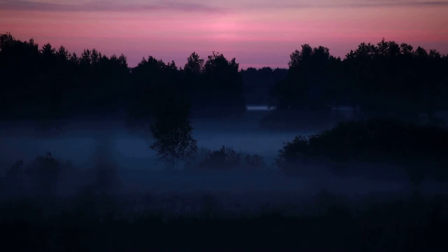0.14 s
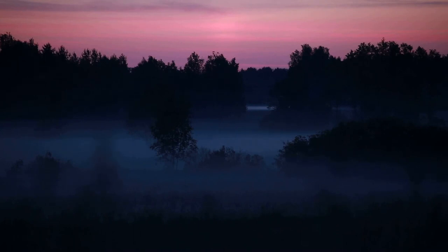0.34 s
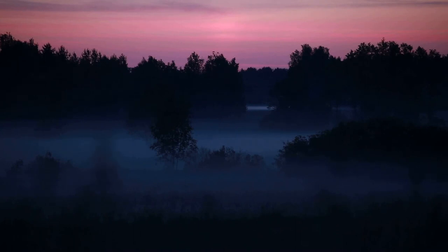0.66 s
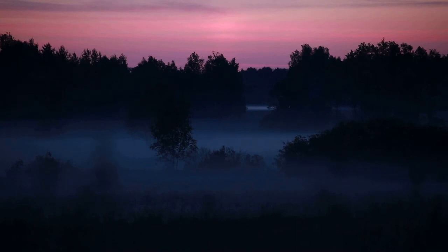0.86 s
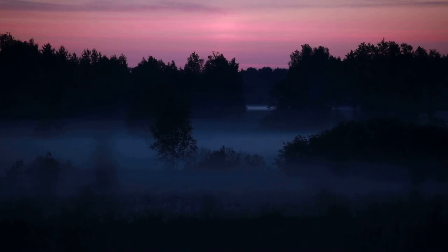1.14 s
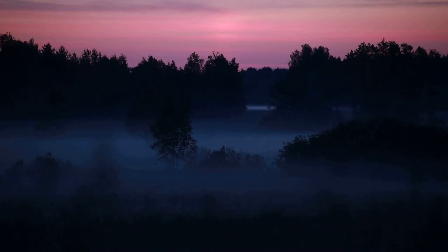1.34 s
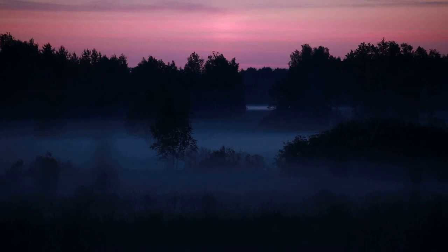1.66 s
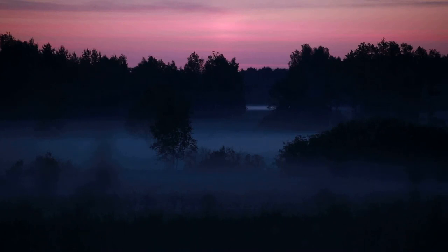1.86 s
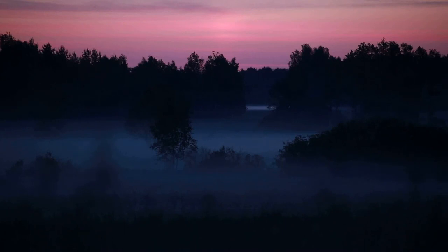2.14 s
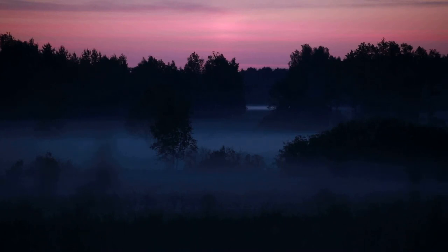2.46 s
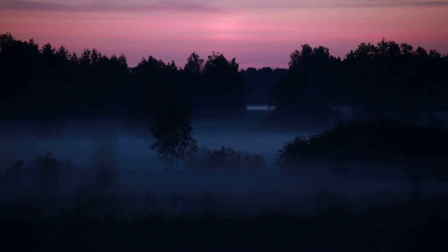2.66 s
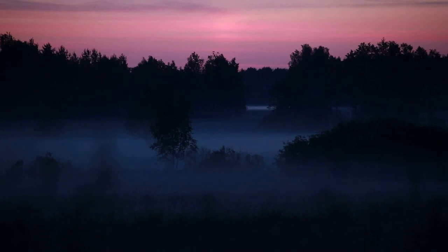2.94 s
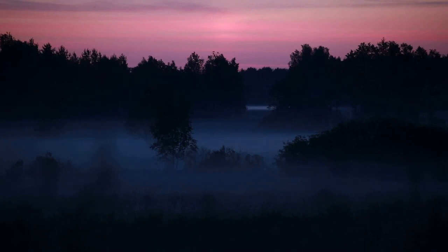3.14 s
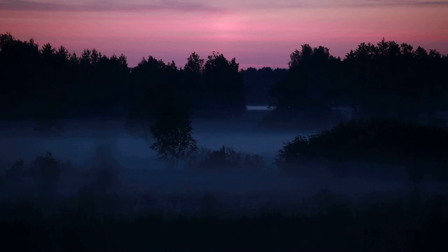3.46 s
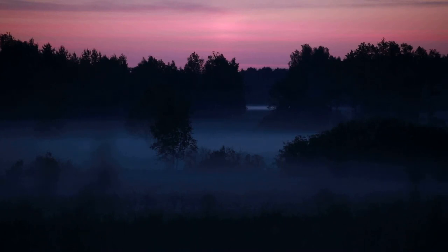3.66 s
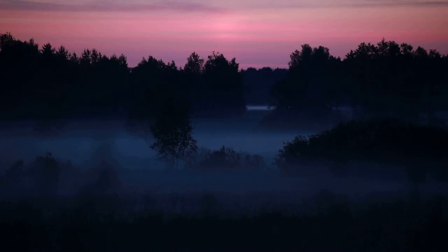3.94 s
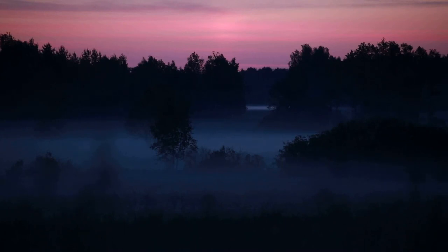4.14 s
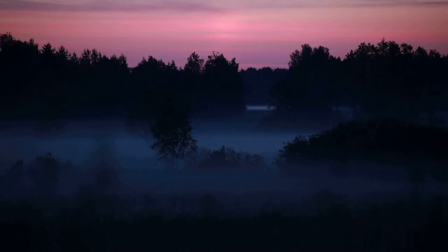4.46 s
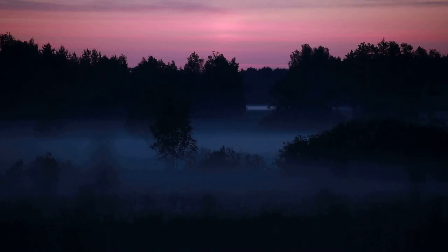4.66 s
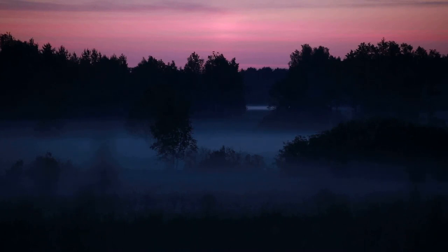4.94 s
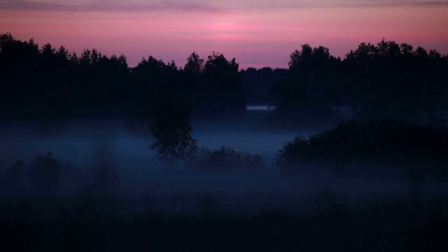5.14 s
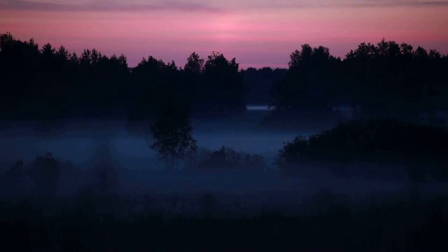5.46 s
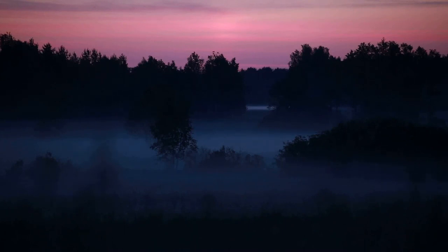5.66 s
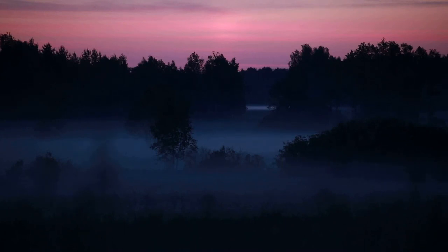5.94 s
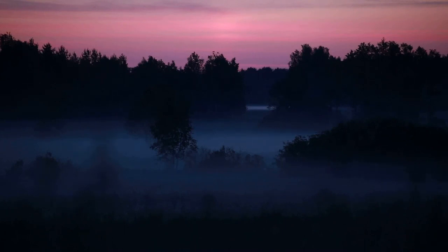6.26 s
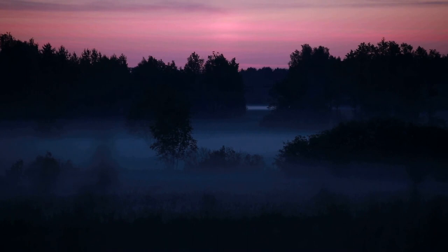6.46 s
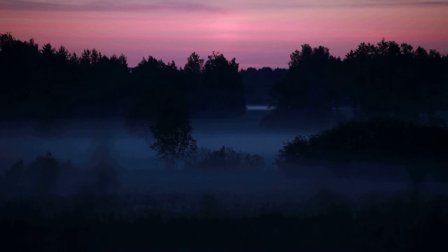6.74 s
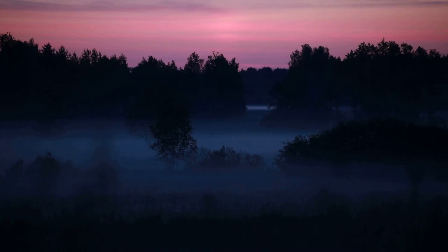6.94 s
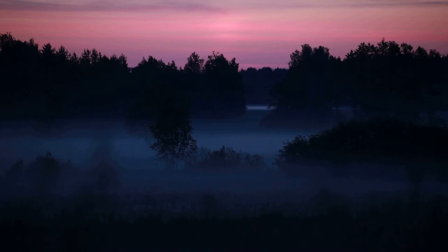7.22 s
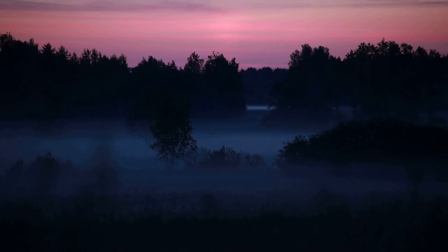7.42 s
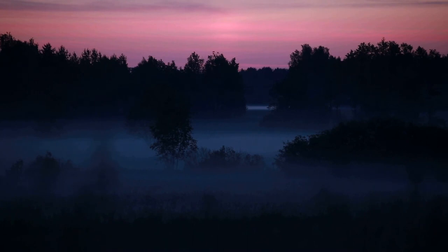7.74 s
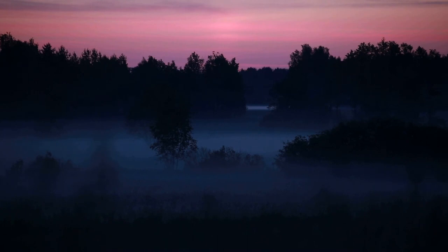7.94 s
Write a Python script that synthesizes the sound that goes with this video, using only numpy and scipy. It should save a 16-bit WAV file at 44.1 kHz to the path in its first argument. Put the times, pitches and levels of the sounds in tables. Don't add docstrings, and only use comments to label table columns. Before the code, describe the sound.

At dawn over a misty meadow, a close warbler starts at once with quick three-pip figures, then runs through falling trills, chirps, buzzes and sliding whistles. Behind it, countless far birds and frogs blur together, with faint whistles and repeated falling slurs. Near the end a frog in a ditch clicks rapidly. One microphone outdoors picks up soft air rumble and hiss, with short scattered echoes from trees.

```python
import sys
import numpy as np
from scipy import signal
from scipy.fft import rfft, irfft, next_fast_len
from scipy.io import wavfile
from scipy.ndimage import uniform_filter1d

SR = 44100
rng = np.random.default_rng(int(sys.argv[2]) if len(sys.argv) > 2 else 0)


def volts_from_db(level):
    exponent = np.asarray(level, float) / 20
    return 10 ** exponent


def wrap_up_sound(samples):
    columns = np.atleast_2d(samples).T
    tamed = np.clip(columns, -1, 1)
    steps = np.round(tamed * 32767).astype(np.int16)
    wavfile.write(sys.argv[1], SR, steps)


N = 356769

ARCH_BOW, DIP_BOW = .06, -.065
PIP_UNEVEN_PITCH = .01


def at_hz(points, hz):
    points = np.array(points)
    return np.interp(np.log(hz), np.log(points[:, 0]), points[:, 1])


def rms_one(x):
    return x / np.sqrt(np.mean(x ** 2) + 1e-20)


def add(out, start_s, hz, gain, waver_db=1.2):
    overtone_db, pitch_waver = -39, .005
    draws = rng.standard_normal(64)
    steps = np.arange(len(hz))
    level_waver = np.interp(steps / SR * 150, np.arange(63), draws[1:])
    pitch_wander = np.interp(steps / SR * 30, np.arange(63), draws[:0:-1])
    hz = hz * (1 + pitch_waver * pitch_wander)
    phase = 2 * np.pi * (np.cumsum(hz) / SR + draws[0])
    tone = np.sin(phase) + volts_from_db(overtone_db) * np.sin(2 * phase)
    tone = tone * gain * volts_from_db(waver_db * level_waver)
    at = round(start_s * SR) + steps
    inside = (at >= 0) & (at < N)
    out[at[inside]] += tone[inside]


def sing(out, notes, edge):
    for start_s, length_s, start_hz, mid_hz, end_hz, level_db in notes:
        z = np.linspace(-1, 1, max(int(length_s * SR), 8))
        bend_hz = (start_hz + end_hz) / 2 - mid_hz
        hz = mid_hz + z * (end_hz - start_hz) / 2 + z ** 2 * bend_hz
        fade = np.sin(np.pi / 2 * np.clip((1 - abs(z)) / edge, 0, 1)) ** 2
        add(out, start_s, hz, volts_from_db(level_db) * fade)


def bowed(notes, bow):
    return [(s, length_s, a, (1 + bow) * (a + b) / 2, b, db) for s, length_s, a, b, db in notes]


def whistle(out, rows, rough_hz=0):
    s, hz, level_db = np.transpose(rows)
    t = np.arange(s[0], s[-1], 1 / SR)
    glide = uniform_filter1d(np.interp(t, s, hz), size=100, mode="nearest")
    glide += rough_hz * signal.sawtooth(2 * np.pi * 150 * t)
    gain = np.interp(t, s, volts_from_db(level_db)) * signal.windows.tukey(len(t), .1)
    add(out, s[0], glide, gain, waver_db=1.16)


def pips(row, count, shape, course, late_s=0):
    first_s, last_s, first_hz, last_hz, peak_db = row
    slowing, bow_hz, in_db, out_db = course
    share, start_off_hz, end_off_hz = shape[:3]
    u = np.linspace(0, 1, count)
    when = u + slowing * (first_hz - last_hz) / 1000 * u * (u - 1)
    at = first_s + (last_s - first_s) * when
    hz = first_hz + (last_hz - first_hz) * when + 4 * bow_hz * when * (1 - when)
    level_db = peak_db + in_db * (1 - when) ** 3 + out_db * when ** 3
    uneven = rng.standard_normal((count, 2))
    hz = hz * (1 + PIP_UNEVEN_PITCH * uneven[:, 0])
    level_db = level_db + 1.2 * uneven[:, 1]
    length = share * np.gradient(at)
    reach = length / length.mean() * (1 - sum(shape[3:]) * when)
    start_hz, end_hz = hz + reach * start_off_hz, hz + reach * end_off_hz
    return np.transpose([at + late_s - length / 2, length, start_hz, hz, end_hz, level_db])


def tree_echoes(x, t60, level_db):
    t = np.arange(SR // 2) / SR
    blur = rng.standard_normal(len(t)) * volts_from_db(-60 * t / t60) * (t > .004)
    blur /= np.linalg.norm(blur)
    return x + volts_from_db(level_db) * signal.fftconvolve(x, blur)[:N]


def opening_triplets():
    # after_beat_s, pitch_hz, slide_hz, level_db
    triplet = [
        (0, 4170, 110, -32),
        (0.011, 4240, 70, -32.5),
        (0.0223, 3700, -220, -34.5),
    ]
    out, pip_s = np.zeros(N), .0069
    figure = []
    for beat in -.0008 + .0488 * np.arange(9) - pip_s / 2:
        swell_db = 2.5 - 18 * abs(beat - .1)
        for s, hz, slide, db in triplet:
            figure.append((beat + s, pip_s, hz - slide, hz, hz + slide, db + swell_db))
    figure = np.array(figure)
    figure[:, 2:5] *= 1 + PIP_UNEVEN_PITCH * rng.standard_normal((len(figure), 1))
    sing(out, figure, edge=0.66)
    return out


def short_notes():
    # start_s, length_s, start_hz, end_hz, peak_db
    mostly_falling = [(0, .056, 1717, 1560, -50), (.03, .72, 4860, 4640, -59), (.125, .022, 2650, 2250, -42),
                      (.166, .063, 3980, 3260, -36.5), (.373, .022, 3880, 3060, -38.5),
                      (.403, .072, 3050, 2280, -41.5), (1.522, .04, 6420, 6000, -51),
                      (1.715, .108, 2050, 1880, -49), (1.89, .023, 3400, 2220, -44.5),
                      (3.968, .056, 2900, 2700, -44), (4.34, .03, 4300, 3460, -35), (4.596, .026, 4200, 3480, -33),
                      (6.006, .13, 1900, 1730, -48.5), (6.705, .014, 6300, 5300, -48),
                      (6.68, .015, 6500, 5250, -46), (6.722, .0098, 6600, 5400, -52),
                      (2.726, .008, 4300, 4800, -35), (2.734, .008, 4350, 4600, -32),
                      (2.742, .008, 4550, 4350, -30), (2.75, .009, 4250, 3950, -32), (7.25, .042, 1560, 1020, -52),
                      (6.572, .022, 2950, 2400, -44), (6.632, .175, 1880, 1780, -43),
                      (6.78, .085, 1800, 1790, -51), (5.75, .022, 3380, 3200, -44), (5.774, .03, 3320, 3150, -46),
                      (6.452, .018, 2700, 2450, -49), (6.513, .062, 5050, 4480, -38),
                      (7.122, .045, 4000, 3050, -52), (1.405, .035, 5050, 4300, -60)]
    rising = [(.846, .085, 3450, 3730, -46), (1.2, .102, 3200, 3750, -48), (1.622, .092, 3070, 3510, -49.5),
              (3.183, .032, 3950, 4800, -44), (3.258, .03, 2450, 3050, -48), (3.419, .039, 3080, 3330, -40),
              (3.836, .022, 4700, 5650, -50), (6.757, .0144, 3610, 4500, -38),
              (7.283, .04, 4130, 4270, -34), (5.744, .01, 2400, 3300, -50), (5.85, .01, 2400, 3350, -50),
              (5.955, .01, 2400, 3450, -50), (7.29, .045, 2850, 3000, -49), (4.08, .025, 2300, 2450, -47),
              (3.008, .008, 3500, 4700, -52), (3.024, .008, 4200, 5800, -52), (3.284, .01, 5600, 6450, -53),
              (7.212, .012, 4200, 4850, -42), (.872, .1, 3090, 3200, -49)]
    arched = [(.355, .022, 4800, 5100, -55), (1.269, .033, 3450, 2180, -47), (2.503, .038, 3625, 2260, -46),
              (7.668, .055, 2800, 2550, -48), (3.886, .039, 3560, 3180, -39.5),
              (5.65, .0139, 2620, 3730, -40.5), (5.85, .029, 3260, 3300, -41),
              (5.958, .027, 3390, 3530, -38.5), (6.568, .068, 3300, 3800, -36),
              (7.028, .056, 1290, 1330, -52), (4.94, .055, 2580, 2380, -50)]
    dipped = [(1.677, .067, 3460, 4400, -46.5), (3.612, .033, 7000, 5650, -51),
              (3.68, .035, 5250, 3300, -40), (3.729, .0096, 4030, 3600, -38),
              (3.863, .022, 5230, 4450, -42.5), (5.545, .012, 4750, 4450, -33),
              (3.762, .048, 3000, 4000, -40), (6.657, .02, 6450, 5850, -55),
              (6.722, .042, 2850, 3750, -41.5), (6.532, .047, 3650, 2950, -38),
              (6.69, .033, 5350, 3750, -37), (6.737, .038, 5250, 3450, -41)]
    hook_notes = [
        (6.867, .046, 4470, 3900, -49.5),
    ]
    # start_s, length_s, pitch_hz, peak_db
    held = [(0, .025, 2820, -47), (.035, .095, 2660, -43), (.25, .07, 1350, -54), (4.918, .035, 5100, -47),
            (3.826, .012, 3650, -48), (.45, .05, 1570, -52), (.6, .1, 2690, -43), (1.697, .043, 2395, -45),
            (2.669, .03, 3400, -37), (2.953, .02, 5030, -42.5), (3.92, .018, 3820, -42),
            (3.929, .021, 4130, -43.5), (8.066, .03, 2650, -46), (5.261, .016, 3760, -42),
            (6.02, .085, 3040, -46), (6.12, .079, 1806, -49), (6.585, .04, 2400, -42),
            (6.508, .022, 3400, -43), (3.29, .024, 6450, -51), (7.082, .075, 1278, -49),
            (7.137, .12, 1560, -49), (7.29, .05, 1000, -55)]
    sag = .012
    out = np.zeros(N)
    sing(out, bowed(arched, ARCH_BOW) + bowed(hook_notes, .3) + bowed(dipped, DIP_BOW), edge=0.27)
    sing(out, bowed(mostly_falling + rising, 0), edge=0.32)
    level_notes = [(s, length_s, hz * (1 + sag / 2), hz, hz * (1 - sag / 2), db)
                   for s, length_s, hz, db in held]
    sing(out, level_notes, edge=0.34)
    return out


def croak(clicks):
    # pitch_hz, level_db, t60_s
    sac_modes = [
        (2050, 11.5, 0.013),
        (1680, -10, 0.0058),
        (2350, -1.5, 0.018),
    ]
    out = 0
    for hz, level_db, t60 in sac_modes:
        r, w = volts_from_db(-60 / (t60 * SR)), 2 * np.pi * hz / SR
        zeros, poles = [0, volts_from_db(level_db) * np.sin(w)], [1, -2 * r * np.cos(w), r * r]
        out = out + signal.lfilter(zeros, poles, clicks + 1e-18)
    return out


def frog_crowd(crowd_db):
    happens = rng.random(N) < 110 / SR
    many = happens * volts_from_db(3.0 * rng.standard_normal(N)) * rng.choice([-1, 1], N)
    many[round(.028 * SR)::round(.037 * SR)] = 1.75
    calls = volts_from_db(crowd_db) * rms_one(croak(many))
    band = signal.butter(2, [1200, 4500], "band", fs=SR, output="sos")
    return signal.sosfilt(band, calls)


def far_birds(level_db, count):
    # pitch_hz, level_db
    far_pitches = [(1400, -15.5), (2000, -2), (2800, 1), (3800, -2), (4800, -7), (5500, -14), (6800, -26)]
    out, draw = np.zeros(N), rng.random((count, 6))
    length = 0.00485 * 16.0 ** draw[:, 1] ** 2
    hz = 1400 * 4.8 ** draw[:, 2]
    steepness = 0.3025 * (0.027 / length) ** 0.314
    bend = 1 + (draw[:, 3:5] - .5) * steepness[:, None]
    loud_db = at_hz(far_pitches, hz) + 9.0 * draw[:, 5] - 7.5 * draw[:, 1]
    sing(out, zip(draw[:, 0] * N / SR, length, hz * bend[:, 0], hz, hz * bend[:, 1], loud_db), edge=0.63)
    return volts_from_db(level_db) * rms_one(out)


def air_and_hiss():
    # pitch_hz, density_db
    floor_spectrum = [(26, -22), (52, -1), (111, -1.5), (408, -5), (1260, -5.5), (1910, -4.5), (3200, -4.8),
                      (4400, -7.5), (5620, -20), (7360, -22), (13600, -19.5), (15700, -24)]
    size = next_fast_len(N)
    hz = np.arange(size // 2 + 1) * SR / size + 1
    spectrum = rfft(rng.standard_normal(size)) * volts_from_db(at_hz(floor_spectrum, hz))
    return volts_from_db(-55) * rms_one(irfft(spectrum, size)[:N])


def high_rasp():
    # time_s, pitch_hz, level_db
    rasp = [
        (.268, 6100, -56),
        (.288, 6800, -49),
        (0.315, 6340, -50),
    ]
    out = np.zeros(N)
    whistle(out, rasp, rough_hz=350)
    return out


def distant_whistles():
    # start_s, length_s, start_hz, end_hz, peak_db
    far_arches = [(1.005, .108, 3550, 4400, -55), (1.37, .135, 3550, 4380, -53),
                  (1.125, .16, 1880, 1850, -52), (1.055, .1, 2200, 2550, -52),
                  (2.04, .065, 4100, 3900, -56), (2.87, .135, 3400, 4000, -54),
                  (3.475, .045, 6400, 5000, -58), (7.045, .08, 2080, 2080, -51),
                  (.305, .11, 2500, 2500, -52), (7.72, .03, 2250, 2300, -51), (2.3, .045, 4250, 3850, -55)]
    far_dips = [(.5, .09, 2850, 3600, -56), (1.85, .1, 4050, 4600, -57), (2.15, .065, 4250, 2750, -55),
                (3.47, .03, 6100, 4300, -53), (3.065, .14, 4050, 2800, -54)]
    far_glides = [(.955, .04, 1700, 1680, -55), (1.345, .05, 1900, 1880, -53), (1.53, .07, 4700, 4600, -58),
                  (1.92, .085, 5450, 5400, -65), (2.005, .04, 4600, 3950, -57),
                  (2.388, .05, 2620, 2580, -51), (2.94, .06, 2100, 2050, -54),
                  (3.02, .036, 5900, 6650, -55), (3.645, .035, 5700, 6100, -56),
                  (3.6, .042, 3900, 4500, -56), (3.49, .03, 3420, 3200, -52),
                  (7.765, .045, 2870, 2780, -53), (3.81, .06, 2700, 2300, -53),
                  (4.03, .02, 5750, 5100, -57), (4.175, .02, 5700, 5100, -57),
                  (4.35, .015, 6000, 5000, -57), (4.3, .22, 4930, 4850, -59), (4.66, .24, 4790, 4740, -58),
                  (4.42, .08, 4500, 4400, -59), (4.42, .04, 3520, 3520, -54), (5.13, .14, 3560, 3440, -55),
                  (5.15, .04, 2720, 2700, -52), (5.31, .08, 4850, 4750, -59), (5.35, .09, 3060, 3040, -56),
                  (5.6, .12, 3330, 3450, -54), (6.02, .09, 2580, 2600, -55), (6.2, .07, 2850, 2700, -54),
                  (6.64, .06, 2660, 2560, -53), (5.855, .022, 5500, 5480, -59),
                  (5.91, .02, 2000, 2080, -53), (5.875, .03, 2450, 2350, -54)]
    out = np.zeros(N)
    sing(out, bowed(far_arches, ARCH_BOW) + bowed(far_dips, DIP_BOW) + bowed(far_glides, 0), edge=.3)
    return out


def trills():
    # first_s, length_s, peak_db
    falling_starts = [(0.583, .113, -34), (0.756, .099, -33), (.917, .114, -31), (1.112, .1, -33.5),
                      (1.289, .112, -33.5)]
    # first_pip_s, last_pip_s, first_hz, last_hz, peak_db
    vees = [
        (1.7775, 2.053, 4150, 2420, -36.5),
        (3.2264, 3.2952, 4250, 3950, -30),
        (3.3095, 3.4555, 3600, 2480, -34.5),
    ]
    chips = [(4.2483, 4.2653, 4430, 4180, -32), (4.381, 4.417, 3360, 2750, -33),
             (4.5055, 4.5217, 4400, 3990, -32), (4.634, 4.6689, 3340, 2850, -33),
             (7.0295, 7.0909, 2590, 2500, -39)]
    rattling = [(4.2825, 4.3242, 3800, 3530, -33), (4.5387, 4.5793, 3300, 3250, -34.5),
                (.575, .665, 7600, 7300, -65), (3.475, 3.535, 7000, 6200, -63)]
    buzzing = [
        (6.1069, 6.3807, 5150, 3150, -32.5),
        (7.6139, 7.8581, 5000, 3300, -35.5),
    ]
    short_buzz = [(7.3575, 7.4872, 3740, 3000, -38)]
    paired = [
        (6.7714, 6.9993, 4290, 2800, -34.5),
        (6.7821, 7.0153, 4290, 2620, -33.5),
    ]
    tremble = [
        (7.229, 7.28, 4250, 4130, -33),
        (6.579, 6.65, 4600, 5370, -40),
    ]
    sagging = [(2.7662, 2.8667, 3250, 2600, -37)]
    arching = [(3.9583, 4.1254, 3850, 2650, -34.5), (7.9655, 8.03, 3900, 2550, -33)]
    hooked = [(2.253, 2.383, 4400, 2500, -36.5)]
    climbing = [(3.262, 3.285, 5300, 6250, -50)]
    leading = [(3.974, 4.074, 3380, 2900, -43)]
    falls = [(s, s + length_s, 4030, 2500, db) for s, length_s, db in falling_starts]
    kinds = [falls, vees, chips, rattling, buzzing, short_buzz, paired, tremble,
             sagging, arching, hooked, climbing, leading]
    pip_counts = [(9, 8, 9, 8, 9), (20, 6, 11), (2, 3, 2, 3, 5), (5, 5, 8, 7), (40, 35), (16,), (8, 8),
                  (5, 5), (6,), (8, 6), (5,), (4,), (5,)]
    # sounding_share of the beat, start_off_hz, end_off_hz, turn of the sweep
    pip_shapes = [(.44, 420, -330, 2.3), (.28, 850, -300, .45), (.5, -280, 170), (.6, -550, 500),
                  (1.15, -350, 170), (1.1, -450, 230), (.34, -620, 220), (.95, 70, -50), (.45, -380, 320),
                  (.36, -600, 100), (.35, -550, 200), (.55, 800, -800), (.6, 60, -120)]
    # slowing per kHz of fall, bow_hz, first_pip_db, last_pip_db
    courses = [(-.125, 320, -6, -8.5), (.04, -70, -4, -4), (-.01, 10, -1.5, -.7), (.01, 5, -.2, -2.2),
               (.24, -170, -11, -9), (.15, -100, 1.5, -2), (-.018, -20, 3.5, -6), (.01, -160, -2, -3),
               (.2, -300, 2.5, -8), (-.08, 420, -5, -4), (.02, -60, -7, -4), (.01, 10, -5, -.5),
               (.01, 80, -3, -1)]
    # pip shape (sounding_share, start_off_hz, end_off_hz), late_s, level_db
    vee_upstroke = ((.44, -350, 420), .0037, -.8)
    hook_downstroke = ((.35, 450, -1300), .0105, -1.5)
    out = np.zeros(N)
    for rows, counts, shape, course in zip(kinds, pip_counts, pip_shapes, courses):
        for row, count in zip(rows, counts):
            sing(out, pips(row, count, shape, course), edge=0.62)
    for kind, (shape, late_s, level_db) in ((1, vee_upstroke), (10, hook_downstroke)):
        for row, count in zip(kinds[kind], pip_counts[kind]):
            second_stroke = np.add(row, [0, 0, 0, 0, level_db])
            sing(out, pips(second_stroke, count, shape, courses[kind], late_s), edge=0.6)
    return out


def repeated_figures():
    # (start_s, level_db, stretch)
    figures = [
        ([(0, 4700, -22), (.005, 4046, 0), (.025, 3250, -3.5), (.035, 2500, -15)], [(5.272, -39.5, 0.86), (5.333, -34.5, 1.05), (5.405, -34.5, 1.07), (5.479, -34, .95), (5.556, -33, 0.73)]),
        ([(0, 5300, -24), (.005, 4350, -1), (.013, 3900, 1), (.027, 3880, -3)], [(5.616, -33, 0.98), (5.711, -37, 0.96), (5.816, -37.5, 0.94), (5.926, -38, 0.92)]),
        ([(0, 1550, -12), (.015, 1725, 0.5), (.034, 1714, 5), (.041, 1623, -10), (.048, 1620, -11), (.058, 1562, 1.5)], [(1.019, -44, 0.95), (1.64, -42.5, 0.95), (2.272, -40.5, 0.96)]),
    ]
    # (start_s, level_db, stretch)
    slide_figure = ([(0, 6330, -24), (.015, 6200, -19), (.031, 5760, -16), (.061, 4980, -11),
                    (.091, 4630, -7.5), (.121, 4360, -1.5), (.152, 4120, -.7), (.172, 3850, -14)],
                    [(1.54, -39, .88), (3.003, -30, 0.99), (4.853, -32, .97)])
    out = np.zeros(N)
    for rows, repeats in figures + [slide_figure]:
        for s, level_db, stretch in repeats:
            whistle(out, np.multiply(rows, [stretch, 1, 1]) + [s, 0, level_db])
    return out


def falling_slurs():
    # start_s, peak_db
    single_slurs = [(2.435, -51), (2.71, -50), (2.772, -53), (3.014, -50), (3.082, -49.5), (3.296, -43),
                    (3.383, -51), (3.519, -50), (4.751, -46)]
    # first_s, beat_s, first_db, last_db
    slur_runs = [
        (3.936, .1165, -44, -42),
        (4.857, .1025, -48, -48),
    ]
    slurs_per_run = (7, 7)
    # length_s, start_hz, mid_hz, end_hz
    full_slur = (.028, 2700, 1950, 1450)
    short_slur = (.018, 2150, 1800, 1480)
    out = np.zeros(N)
    slurs = [(s, *full_slur, db) for s, db in single_slurs]
    for (first, beat, a, b), count, slur in zip(slur_runs, slurs_per_run, (full_slur, short_slur)):
        slurs += [(first + k * beat, *slur, a + (b - a) * k / count) for k in range(count)]
    sing(out, slurs, edge=0.6)
    sing(out, np.add(slurs, [.011, 0, 0, 0, 0, -5]), edge=0.6)
    return out


def zigzag():
    # first_pip_s, last_pip_s, first_hz, last_hz, peak_db
    zigzag_row = (2.6012, 2.6775, 2900, 4650, -32.5)
    # pip shape (sounding_share, start_off_hz, end_off_hz), late_s
    strokes = [
        ((0.27, 650, -250), -0.0021),
        ((.25, 950, -900), 0.0019),
    ]
    # slowing per kHz of fall, bow_hz, first_pip_db, last_pip_db
    zigzag_course = (-.11, 300, -7, -2)
    out = np.zeros(N)
    for shape, late_s in strokes:
        sing(out, pips(zigzag_row, 5, shape, zigzag_course, late_s), edge=0.74)
    return out


def even_series():
    # rows (time_s, pitch_hz, level_db), rough_hz
    series = [
        ([(0, 5200, -58), (.06, 4920, -52.5)], 110),
        ([(.07, 4830, -74), (.22, 4800, -61.5)], 0),
        ([(.08, 6400, -72), (.145, 6650, -65)], 300),
    ]
    out = np.zeros(N)
    for beat in 4.065 + .195 * np.arange(6):
        for rows, rough_hz in series:
            whistle(out, np.add(rows, [beat, 0, 0]), rough_hz=rough_hz)
    return out


def near_frog():
    # start_s, peak_db, pitch_hz
    warmup = [(6.4762, -50, 1680), (6.5026, -50, 1250), (6.55, -47, 1290), (6.5864, -48, 1280),
              (6.6154, -47, 1290), (6.6593, -44, 1420), (6.6912, -43, 1530), (6.7263, -43, 1640),
              (6.7615, -40, 1640), (6.7965, -40, 1560), (6.831, -42, 1750)]
    main_clicks = [(6.8613, -40, 2010), (6.9032, -38, 2010), (6.9376, -39, 2060), (6.9726, -38, 2030),
                   (6.9894, -39, 2060), (7.016, -37, 2040), (7.0444, -38, 2020), (7.1247, -37, 2040),
                   (7.1581, -37, 2080), (7.1831, -40, 2170), (7.1974, -42, 2170), (7.2295, -39, 2180),
                   (7.2534, -38, 2170), (7.2654, -42, 2160), (7.2898, -39, 2190), (7.3034, -37, 2170),
                   (7.3272, -35, 2060), (7.3701, -35, 2060), (7.4061, -37, 2050), (7.431, -41, 2060),
                   (7.445, -36, 2060), (7.4699, -42, 2060), (7.4834, -37, 2030), (7.5128, -34, 2040),
                   (7.5443, -44, 2020), (7.5582, -36, 2030), (7.5867, -36, 2030)]
    ending = [
        (7.6064, -44, 1760),
        (7.6365, -37, 1790),
        (7.6514, -41, 1770),
        (7.6655, -39, 1810),
    ]
    out, t = np.zeros(N), np.arange(SR // 20) / SR
    attack_s, t60_s = .0004, .022
    ring = (1 - np.exp(-t / attack_s)) * volts_from_db(-60 * t / t60_s)
    ring /= ring.max()
    settling = 1 + .13 * np.exp(-t / .0018)
    snap = np.exp(-t / .00025)
    for s, level_db, hz in warmup + main_clicks + ending:
        add(out, s, hz * settling, volts_from_db(level_db - 1.5) * ring)
        add(out, s, hz + 0 * t, volts_from_db(level_db - .5) * snap)
    return out


def scene():
    # time_s, frogs_db, birds_db
    crowd = [(0, -51.5, -59.5), (1, -57.5, -54), (3.6, -63, -53.5), (3.85, -55, -54), (4.75, -55.5, -54.5),
             (4.95, -63, -55), (6.7, -64.5, -55.5), (7, -53.5, -57), (7.65, -66, -61.5), (7.8, -68, -56.5)]
    s, *columns = np.transpose(crowd)
    frogs_db, birds_db = (np.interp(np.arange(N) / SR, s, c) for c in columns)
    near = opening_triplets() + short_notes() + high_rasp() + trills()
    near = near + repeated_figures() + zigzag() + even_series()
    near = tree_echoes(near, t60=0.24, level_db=-15.5)
    far = frog_crowd(frogs_db) + far_birds(birds_db - .4, count=1700)
    far = tree_echoes(far, t60=0.38, level_db=-4.5)
    middle = distant_whistles() + falling_slurs() + near_frog()
    middle = tree_echoes(middle, t60=.3, level_db=-8)
    return np.tile(near + middle + far + air_and_hiss(), (2, 1))


def low_pass(x):
    return signal.sosfilt(signal.butter(12, 15890, fs=SR, output="sos"), x)


def record(dry):
    return low_pass(dry)


dry = scene()
out = record(dry)
wrap_up_sound(out)
```